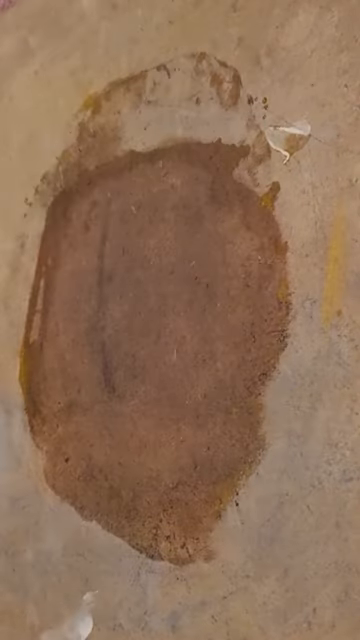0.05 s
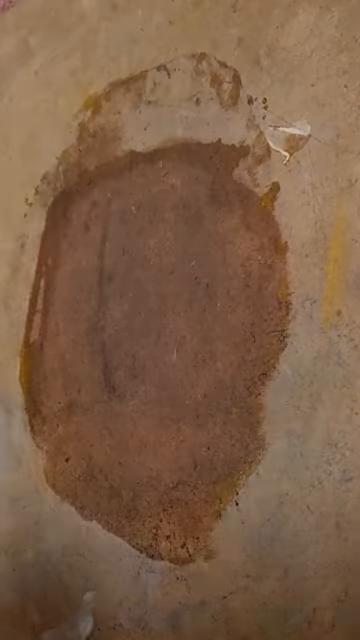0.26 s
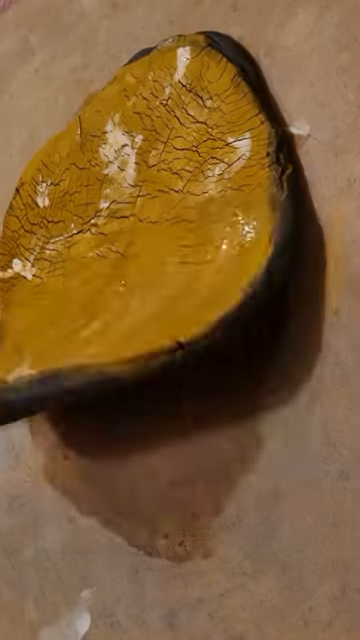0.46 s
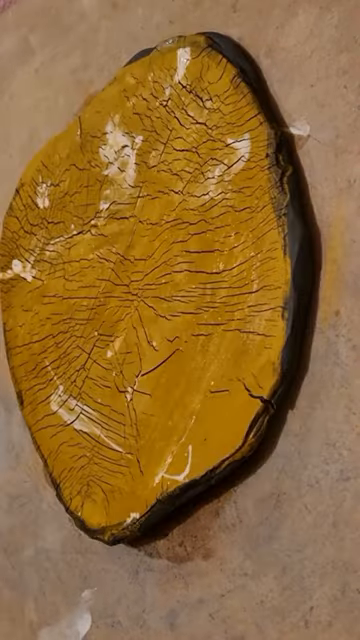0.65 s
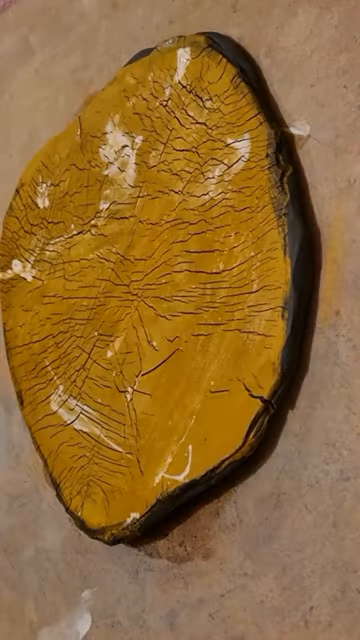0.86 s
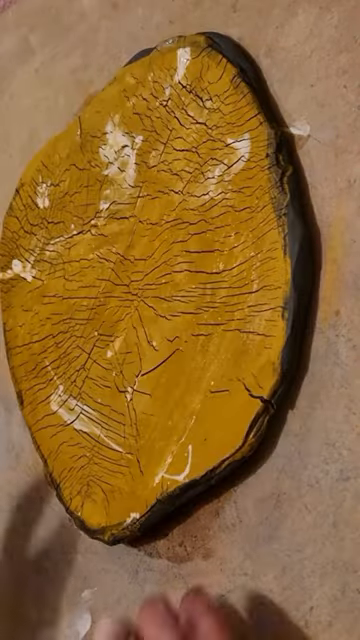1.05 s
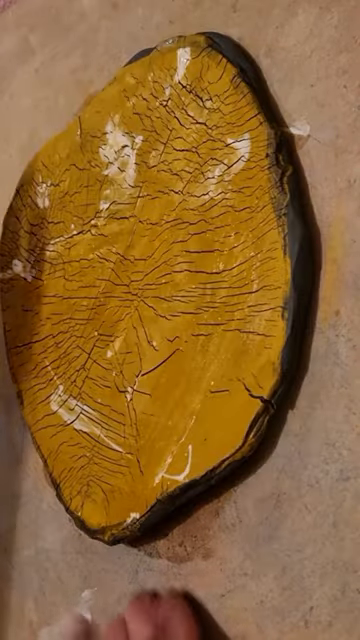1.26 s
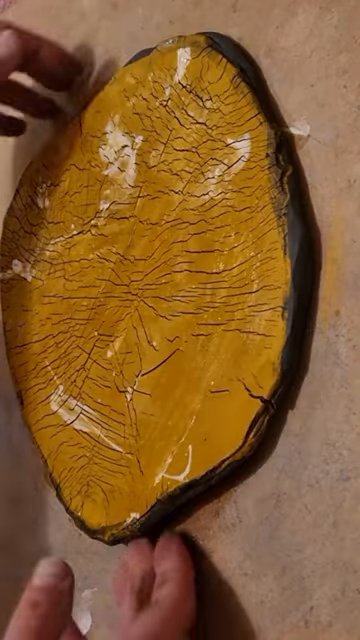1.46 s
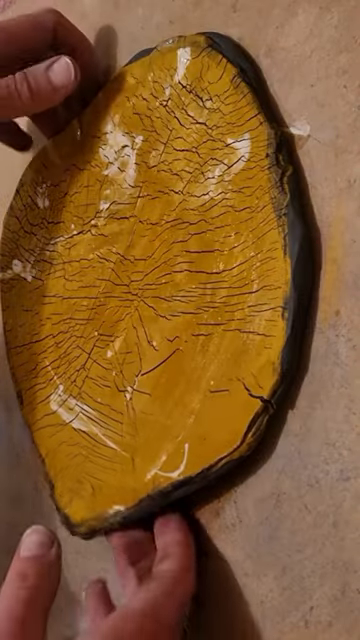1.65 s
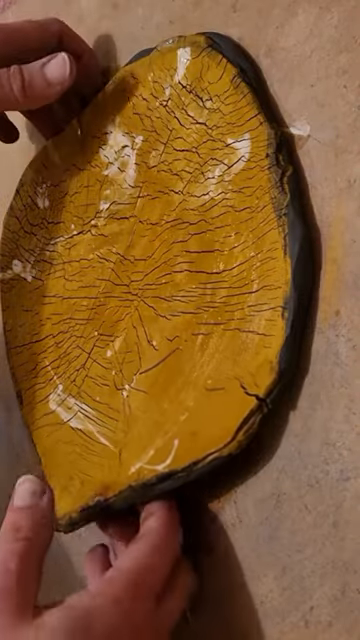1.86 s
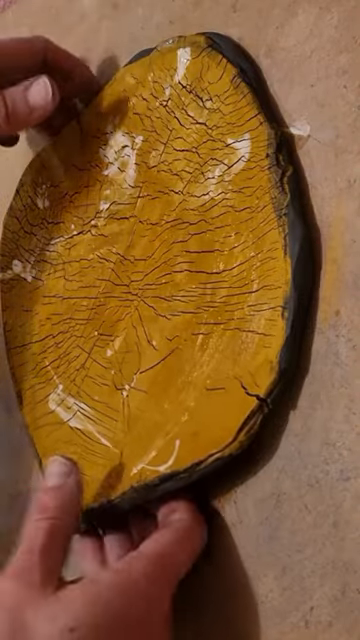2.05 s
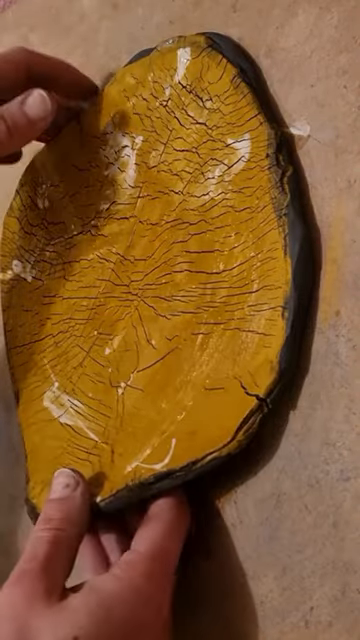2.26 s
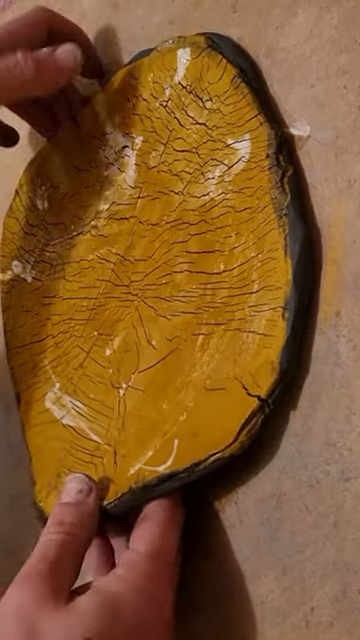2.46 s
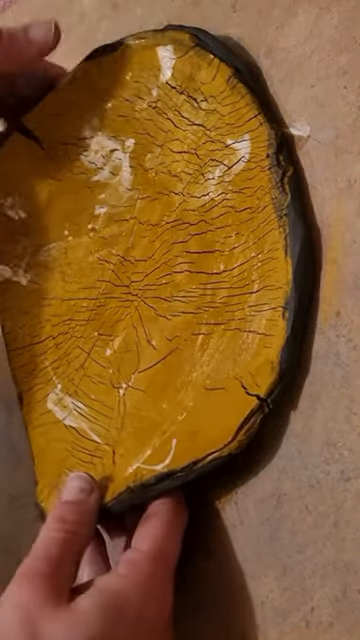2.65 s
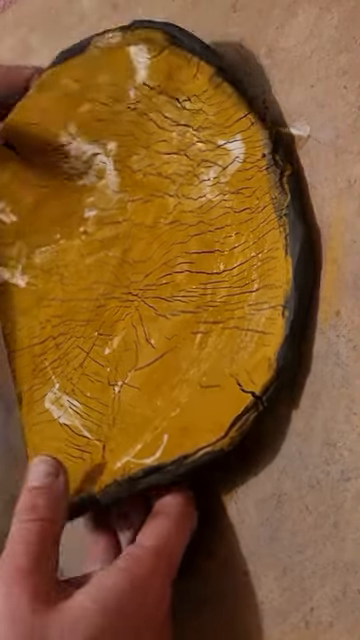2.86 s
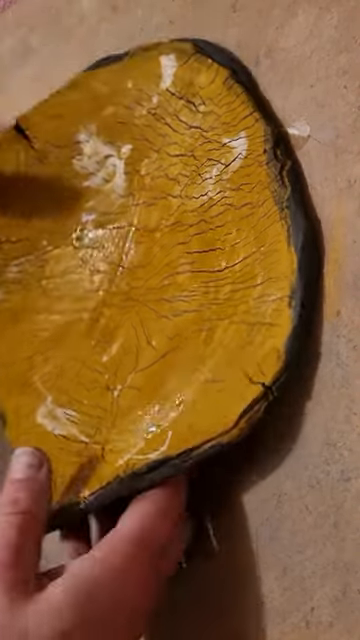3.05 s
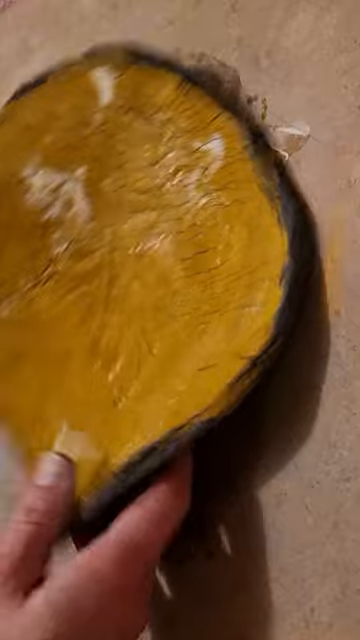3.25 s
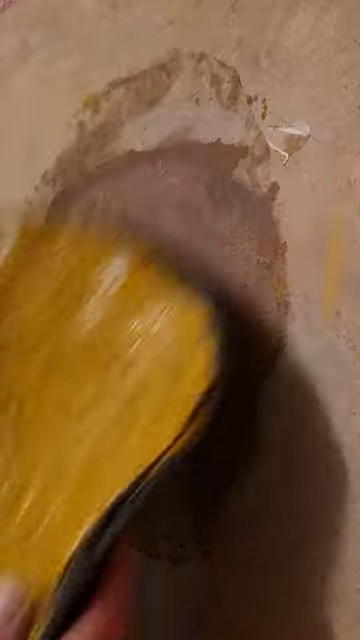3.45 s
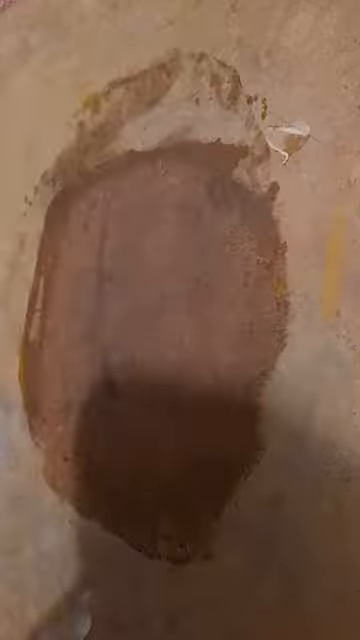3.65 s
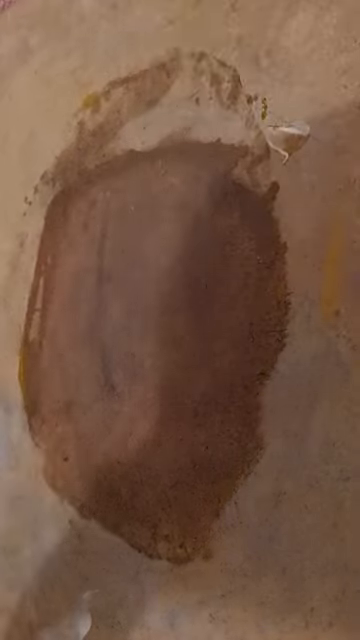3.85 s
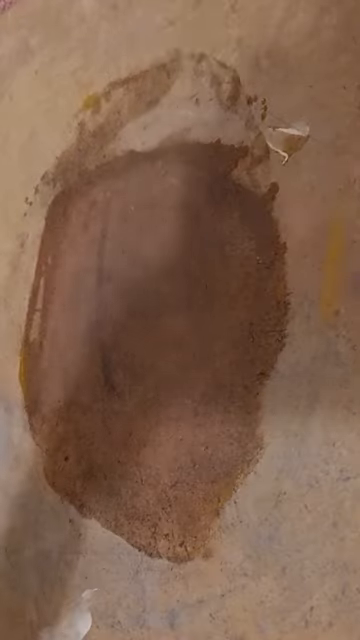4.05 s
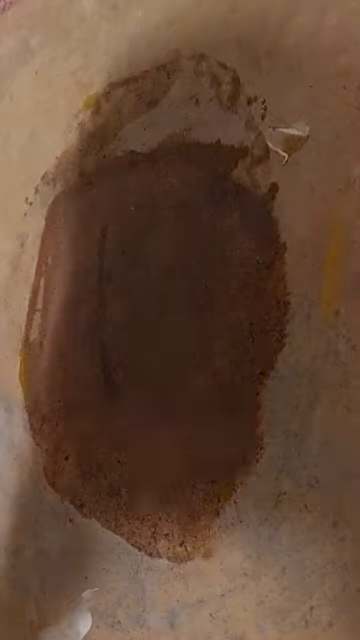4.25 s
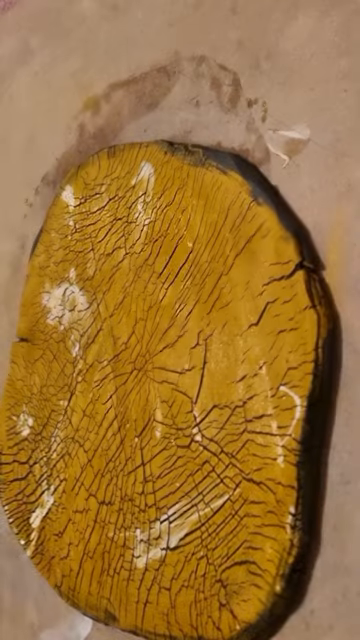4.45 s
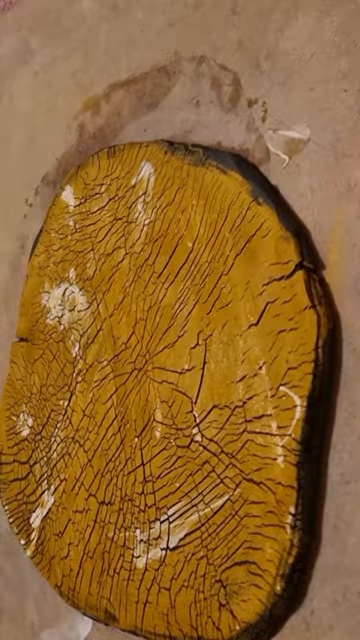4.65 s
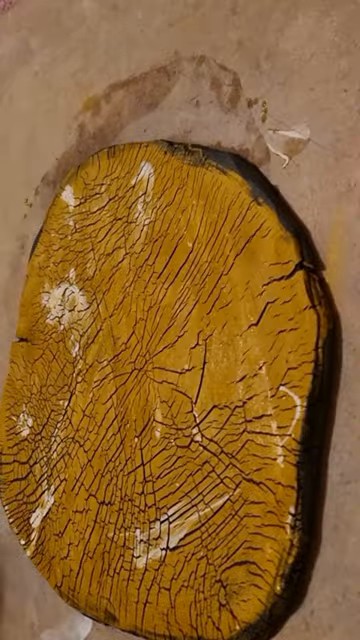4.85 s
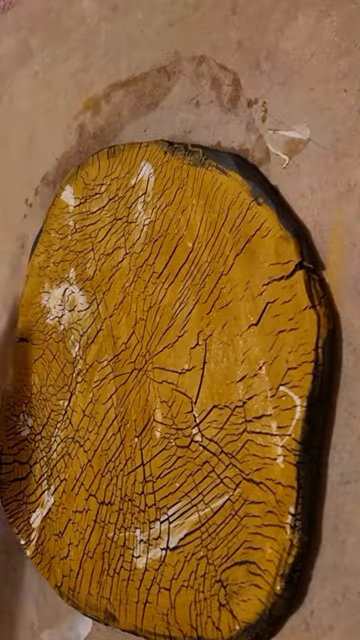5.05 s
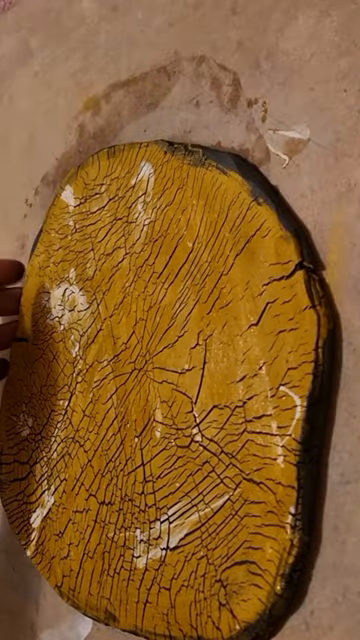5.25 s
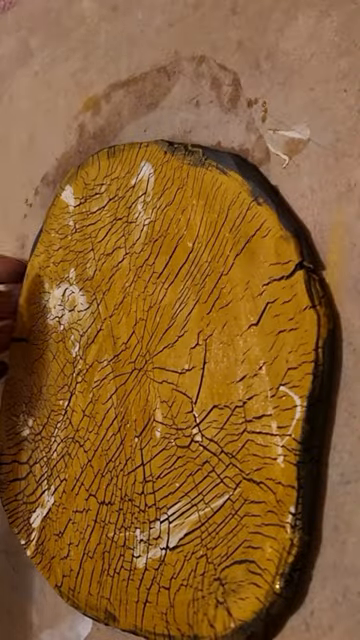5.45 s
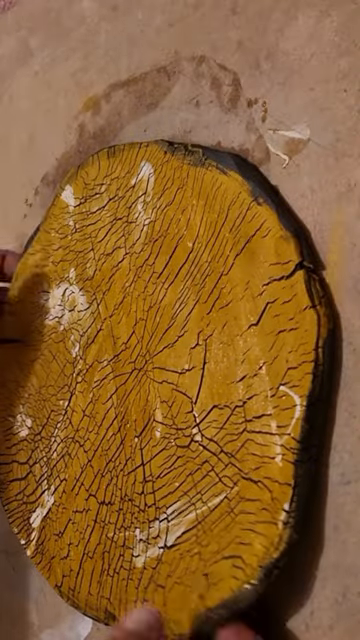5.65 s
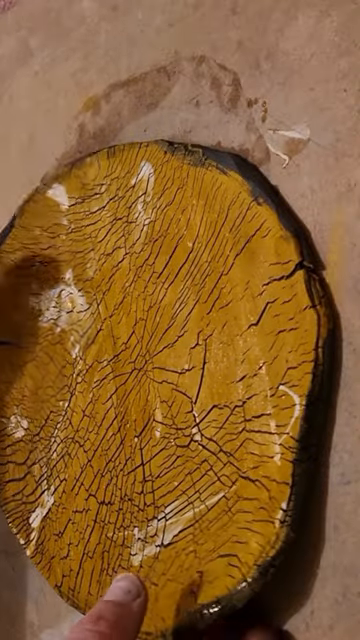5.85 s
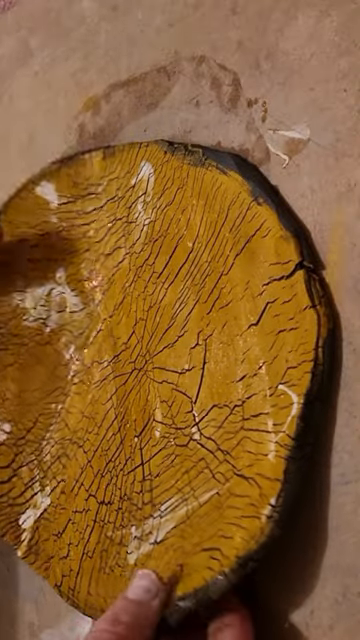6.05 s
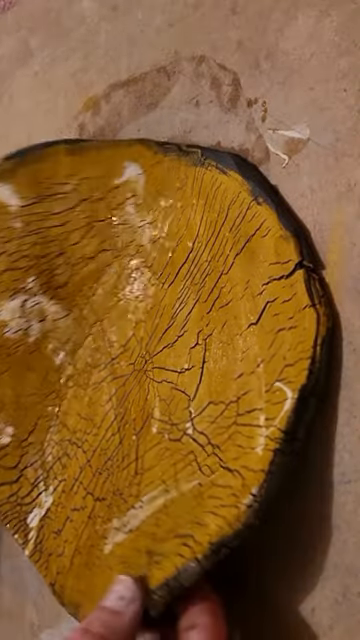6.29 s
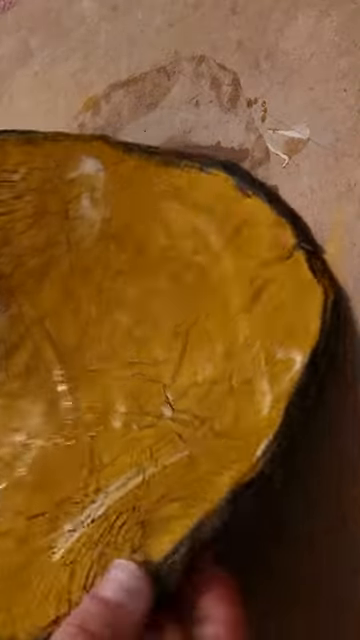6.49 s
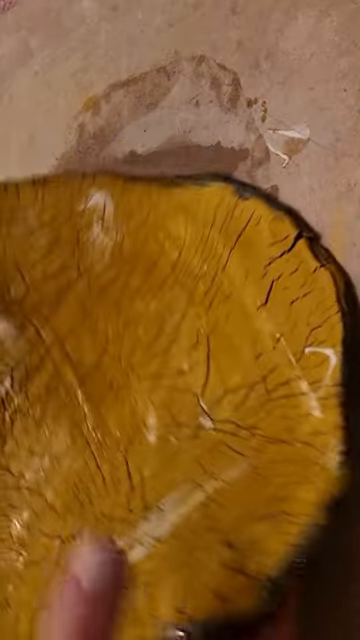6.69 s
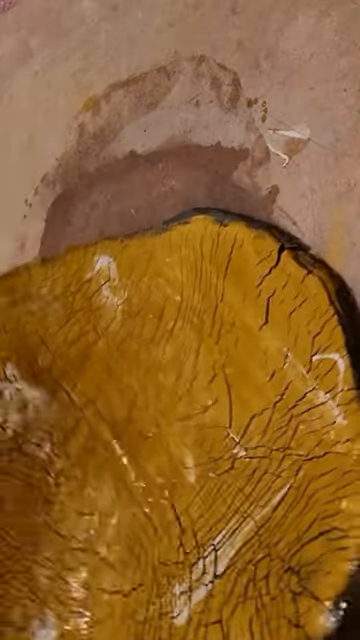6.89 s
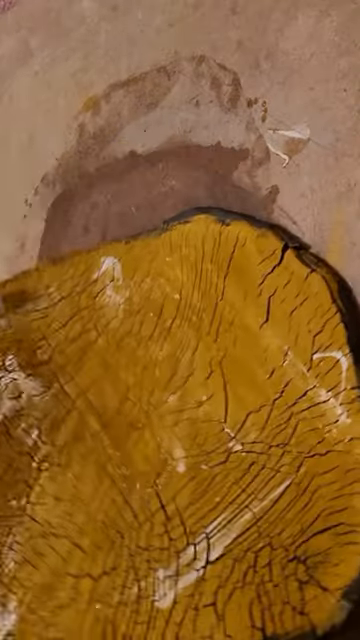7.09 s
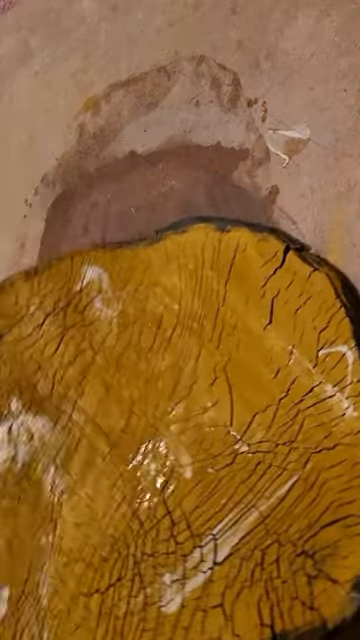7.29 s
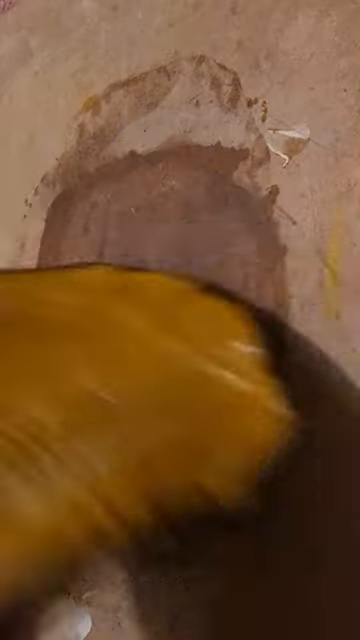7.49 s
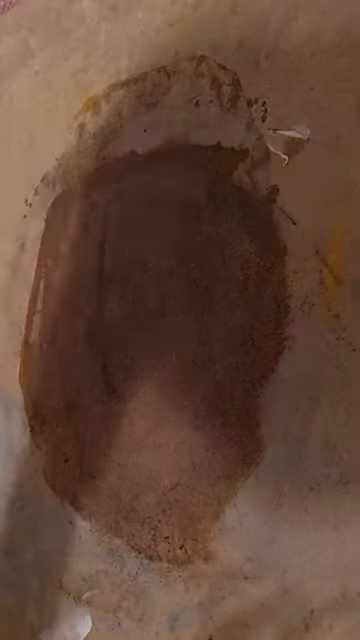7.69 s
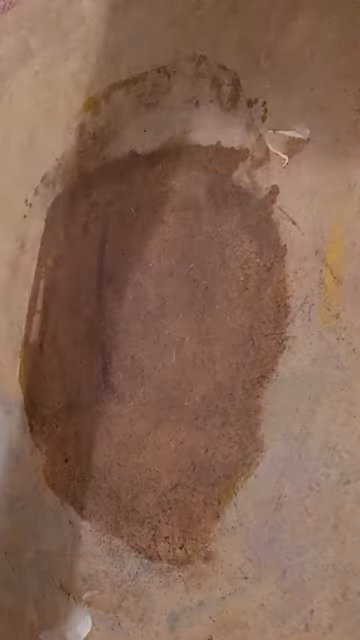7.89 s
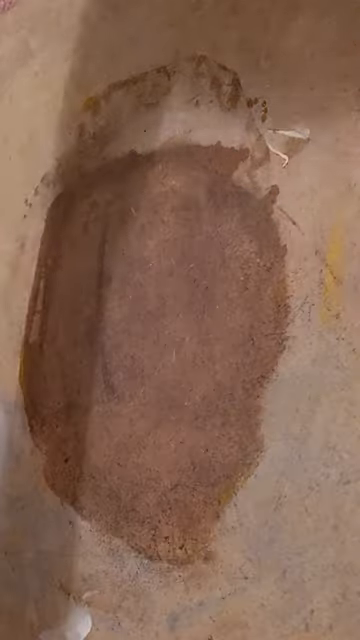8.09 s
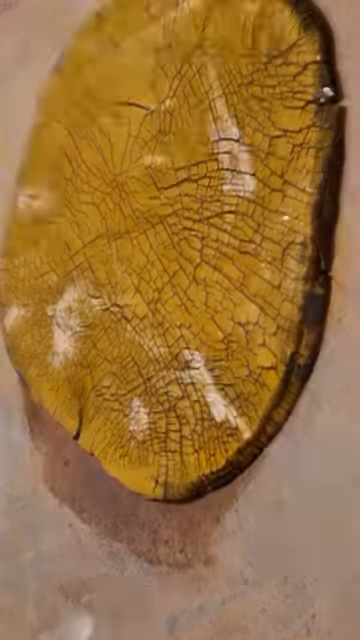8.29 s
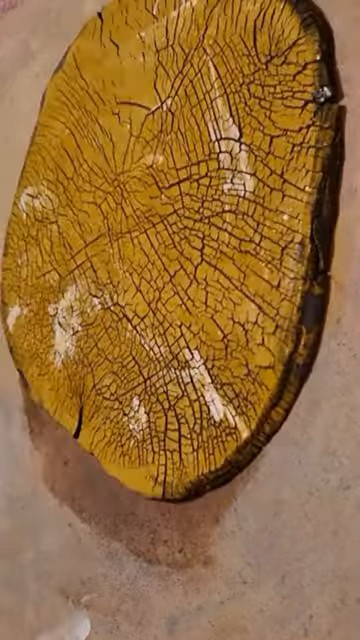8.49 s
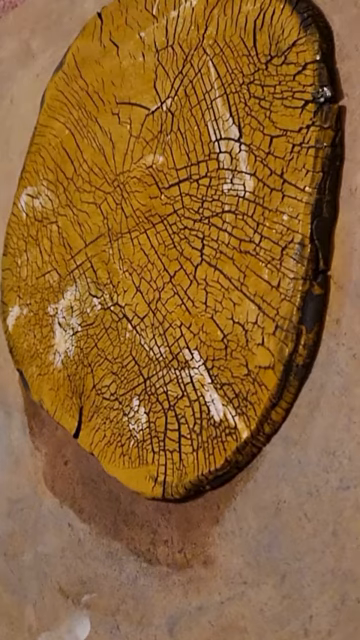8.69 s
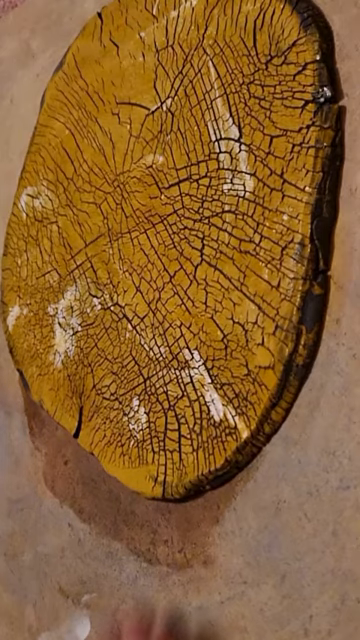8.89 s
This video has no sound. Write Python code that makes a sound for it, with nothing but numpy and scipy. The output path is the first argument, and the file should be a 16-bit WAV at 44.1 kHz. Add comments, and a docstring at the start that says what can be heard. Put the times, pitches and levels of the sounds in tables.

```python
"""Wet clay thrown on a table

A wet slab is thrown three times onto a work table in a small studio, close to the listener. Each throw is two
blows of filtered contact sprays, edge then face: knock, smack and crack, with shaped noise for puffs and spurts.
Decaying sine modes make the table boom; a slow sine sways it after the hardest throws.
Between throws, flickering noise bands rub and peel, gentler blows bump and tiny sines pop.
A fan's faint sine lines and rumbling noise lie beneath."""
import sys
import numpy as np
from scipy import signal
from scipy.fft import rfft, irfft, next_fast_len
from scipy.io import wavfile
from scipy.ndimage import map_coordinates

SR = 44100
rng = np.random.default_rng(int(sys.argv[2]) if len(sys.argv) > 2 else 0)


def persist_wave(psi):
    """Save psi, clipped to +-1, as 16-bit WAV."""
    counts = np.round(np.clip(psi, -1, 1) * 32767).astype(np.int16)
    wavfile.write(sys.argv[1], SR, np.atleast_2d(counts).T)


N = 393813
T = np.arange(SR // 2) / SR  # time within one event, s

# blows of the throws, edge then face: t/s, thud/dB, smack/dB, crack/dB, crack f/Hz, left over right/dB,
# table boom/dB, puff/dB, spurt/dB, puff and spurt brightness/(dB per octave), gap resonance f/Hz
BLOWS = [(0.481, -25.5, -37.5, -40.5, 3379, -2.5, -19.5, -46.5, -29.5, -0.5, 3117),
         (.5325, -8.5, -15, -24.5, 2852, -3, -15, -19, -27.5, -2, 179.8),
         (4.481, -10, -17.5, -25, 3336, -.5, -9.5, -27, -29, 0, 544.8),
         (4.5146, -14.5, -22, -20, 5610, .5, -17, -34.5, -33, -2.5, 1250),
         (8.4291, -16, -20, -23.5, 3231, 0, -38.5, -21.5, -36.5, 2, 4884),
         (8.4448, -29.5, -34.5, -18.5, 3869, -4.5, -9.5, -40.5, -24.5, 0, 344.5)]
# the lifted slab and the knuckles bump the table: t/s, level/dB, knock f/Hz, wetness/0-1
BUMPS = [(1.32, -53.5, 368, 0.73), (2.392, -28.5, 200, 0.74), (2.894, -26.5, 454, .75),
         (3.054, -55.5, 345, 1), (3.113, -48, 420, 0.75), (3.174, -37.5, 350, 0.4), (3.274, -29, 360, 0),
         (3.308, -32.5, 229, .45), (3.428, -51, 174, 0.43), (5.207, -51, 298, 0.7), (5.403, -52, 330, .95),
         (6.025, -55, 376, 1), (6.105, -39.5, 367, 0.97), (6.24, -49, 560, 0.83), (6.287, -44, 234, 0.06),
         (6.348, -47.5, 231, .8), (6.41, -46, 444, .65), (6.614, -49.5, 500, 0.3),
         (6.711, -52.5, 241, 0.46), (7.093, -38.5, 200, 0.13), (7.31, -34.5, 264, .7),
         (7.321, -27, 260, 0.73)]


def amp(db):
    """Decibels to gain."""
    return 10 ** (np.asarray(db) / 20)


def unit(x):
    """Scale to rms 1."""
    return x / np.sqrt(np.mean(x ** 2) + 1e-20)


def punch(x):
    """Scale a short stereo sound to the energy of 5 ms at rms 1."""
    return x / np.sqrt(np.sum(x ** 2) / (2 * .005 * SR))


def along(points, hz):
    """Interpolate (Hz, value) points on a log frequency axis."""
    f, v = np.transpose(points)
    return np.interp(np.log(hz + 1), np.log(f + 1), v)


def bell(hz, centre, octaves):
    """A hump of height 1 on the log frequency axis."""
    return np.exp(-(np.log2((hz + 1) / centre) / octaves) ** 2)


def add(track, s, x):
    """Mix x into the track from time s."""
    i = round(s * SR)
    track[..., i:i + x.shape[-1]] += x[..., :N - i]


def filtered(x, response):
    """Multiply the spectrum of x by a complex response, padded against wrap-around."""
    m = 2 * next_fast_len(x.shape[-1] // 2 + 4096)
    spectrum = rfft(x, m) * response(np.fft.rfftfreq(m, 1 / SR))
    return irfft(spectrum, m)[..., :x.shape[-1]]


def causal(db):
    """The minimum-phase response with this gain: it rings only after its input."""
    c = irfft(db * np.log(10) / 20)  # cepstrum, folded onto positive time
    c[1:len(c) // 2] *= 2
    c[len(c) // 2 + 1:] = 0
    return np.exp(rfft(c))


def noise(spectrum, n, tilt=0):
    """Coloured stereo noise of rms 1, alike in the bass and unrelated in the treble."""
    # stereo width: f/Hz, left-right likeness/0-1
    likeness = [(100, 0.95), (300, 0.93), (600, 0.52), (1200, 0.011), (3000, 0.019), (15000, 0.02)]

    def mid_and_side(hz):
        turn = np.arccos(np.clip(along(likeness, hz), -1, 1)) / 2
        colour = amp(along(spectrum, hz) + tilt * np.log2(np.maximum(hz, 200)))  # tilt in dB per octave
        return colour * [np.cos(turn), np.sin(turn)]

    mid, side = filtered(rng.standard_normal((2, n)), mid_and_side)
    return unit(np.array([mid + side, mid - side]))


def wobble(rate, n):
    """A smooth random curve, rate knots a second."""
    knots = rng.standard_normal(int(n * rate / SR) + 4)
    return map_coordinates(knots, [np.arange(n) * rate / SR])


def shifting(x, depth_db):
    """The hollows under the clay change their resonances as it moves: a drifting random gain field."""
    hz, t, z = signal.stft(x, SR, nperseg=1024)
    places = np.meshgrid(np.sqrt(hz) / 2, 20 * t, indexing="ij")
    field = map_coordinates(rng.standard_normal((80, 40)), places)
    moved = signal.istft(z * amp(depth_db * field), SR, nperseg=1024)[1]
    return unit(moved[:, :x.shape[-1]])


def swell(rise, fall):
    """An envelope that climbs 40 dB in rise s to its peak at mid-event and drops 40 dB in fall s."""
    t = T - T.mean()
    return amp(-40 * np.maximum(-t / rise, t / fall))


def background():
    """Room rumble as shaped noise, with the fan's faint sine lines wandering in phase."""
    # room tone: f/Hz, relative density/dB
    air = [(21, -32.5), (35, -4.5), (62, 2), (126, -11), (265, -20.5), (301, -9.5), (370, -23), (399, -11),
           (466, -36), (543, -29.5), (758, -31.5), (840, -33), (6360, -44.5), (14800, -46), (16000, -52)]
    # fan lines: f/Hz, relative level/dB
    fan = [(301.5, -85.5), (398.4, -80), (4700, -109), (6896, -108), (8296, -104)]
    t = np.arange(N) / SR
    hum = 0
    for hz, db in fan:
        hum += amp(db) * np.sqrt(2) * np.sin(2 * np.pi * hz * t + 0.23 * wobble(1.5, N))
    return amp(-63.5) * noise(air, N) + amp(-5.5) * hum


def studio(x, gap, echo_db):
    """The walls answer after a short gap (s) with decaying noise; the bass lingers longest."""
    # reverberation: f/Hz, t60/s
    decay = [(80, 0.53), (220, .4), (500, 0.26), (2000, .33), (6000, 0.28), (10000, 0.24), (15000, 0.029)]
    # echo colour: f/Hz, relative level/dB
    walls = [(40, -14.5), (125, -17), (190, 0), (400, -3.5), (700, -1), (1100, -5), (2500, -1),
             (6000, -1.5), (10000, -2), (15000, -0.5)]
    out = np.zeros((2, N))
    for i in range(0, N, SR):  # a new echo pattern every second, as the potter moves
        hz, t, z = signal.stft(noise(walls, len(T)), SR, nperseg=256)
        fading = z * amp(-60 * t / along(decay, hz)[:, None])
        tail = signal.istft(fading, SR, nperseg=256)[1][:, :len(T)]
        tail = tail * (1 - np.exp(-(T / gap) ** 2))
        tail = tail / np.linalg.norm(tail[0])
        add(out, i / SR, signal.fftconvolve(x[:, i:i + SR], tail, axes=1))
    return amp(echo_db) * out


def nearby(x, strength, reach):
    """Table, hands and apron throw back quick copies within reach s, which colour each ear differently."""
    out = np.zeros((2, N))
    step = SR // 2  # new copies every half second
    for i in range(0, N, step):
        taps = np.zeros((2, SR // 20))
        for ear in taps:
            delays = (SR * reach * rng.uniform(.1, 1, size=4)).astype(int)
            ear[delays] = rng.choice([-1, 1], size=4) / 2
        add(out, i / SR, signal.fftconvolve(x[:, i:i + step], taps, axes=1))
    small = lambda f: 1j * f / (1j * f + 600)  # small surfaces return little bass
    return x + strength * filtered(out, small)


def sway(hz, t60):
    """The hardest throws rock the frame on its legs: a slow sine that outlasts the ring of the top."""
    # sways: t/s, relative level/dB
    rocks = [(4.484, -29), (8.443, -28.5)]
    out = np.zeros(N)
    t = np.arange(2 * SR) / SR
    for s, db in rocks:
        rocking = np.sin(2 * np.pi * hz * t + 0.35 * wobble(7.2, len(t)))
        add(out, s, amp(db - 60 * t / t60) * rocking * (1 - np.exp(-t / 0.011)))
    return out


def table():
    """Every blow, sag and bump rings the table's modes; a longer push favours the lowest ones."""
    # modes before the load retunes them: f/Hz, relative level/dB, t60/s
    modes = [(46, -2, 0.28), (66.8, -0.5, 0.4), (75, -8, 0.41), (161.5, -10, 0.33), (185.6, -12, 0.36),
             (231, -15, 0.25), (292, -24, 0.23), (340, -13.5, 0.47), (520.6, -17, 0.13), (610, -20, 0.16),
             (854, -21, .2)]
    # each throw loads the table in a new place: from t/s, tuning factor of the modes
    loads = [(0, 1.01), (4, .97), (8, 1.09)]
    # the weight sags and settles: t/s, relative push level/dB
    sags = [(.605, -19.5), (.725, -38), (2.396, -47), (3.309, -33.5), (4.64, -30.5), (8.54, -21)]
    slap_push, sag_push, bump_push = .007, 0.0074, 0.0012  # duration of contact, s
    bump_boom_db, bump_lowest_hz = -16.5, 150  # a bump near the rim rings mostly above this pitch
    out = np.zeros((2, N))
    t = np.arange(3 * SR // 4) / SR
    ears = .22 * np.array([[-1], [1]])  # phase offset at each ear, radians
    pushes = [(s, boom_db, slap_push, 0) for s, _, _, _, _, _, boom_db, *_ in BLOWS]
    pushes += [(s, db, sag_push, 0) for s, db in sags]
    pushes += [(s, db + bump_boom_db, bump_push, bump_lowest_hz) for s, db, *_ in BUMPS]
    for s, db, push, lowest_hz in pushes:
        tuning = [factor for since, factor in loads if since <= s][-1]
        settling = 1.1 * wobble(15, len(t))  # the spreading clay keeps retuning the top
        settling = settling - settling[0]
        ring = 0
        for hz, level, t60 in modes:
            reach = 1 / np.hypot(1, hz * push) / np.hypot(1, (lowest_hz / hz) ** 2)
            phase = 2 * np.pi * hz * tuning * t + rng.normal() * settling
            ring = ring + amp(level - 60 * t / t60) * np.exp(1j * phase) * reach
        add(out, s, amp(db - 1) * np.imag(ring * np.exp(1j * ears)) * (1 - np.exp(-t / push)))
    return out


def pops():
    """Tiny air pockets pop in the settling wet clay: short, high, wavering sines."""
    # bubbles: t/s, f/Hz, level/dB
    bubbles = [(4.692, 11950, -59), (8.608, 11770, -60), (8.81, 11950, -78)]
    out = np.zeros(N)
    for s, hz, db in bubbles:
        ring = np.sin(2 * np.pi * hz * T + 0.95 * wobble(300, len(T)))
        add(out, s, amp(db - 60 * T / 0.083) * ring)
    return out


def strokes():
    """Sticky friction of fingers and clay: a firm grip drags low, a light one leaves a grainy rub and fine hiss."""
    # slides over the top: start t/s, length/s, rub/dB, grip as drag over rub/dB
    slides = [(0.992, .26, -92, -17.5), (1.309, .21, -81.5, 2), (1.555, .08, -73, 6.5),
              (1.648, 0.12, -64.5, -2), (1.77, 0.21, -73.5, -14.5), (2.001, .24, -79.5, -2),
              (2.94, .14, -80.5, 11.5), (3.428, .15, -79, -6), (3.558, .1, -71.5, -12),
              (5.297, .27, -84, 10), (5.56, .25, -80, 8), (5.819, .11, -75, 4.5), (6.016, .08, -70.5, 3.5),
              (6.109, .19, -74.5, 4), (6.349, .28, -80, -25), (6.47, .18, -87.5, 18),
              (7.461, 0.17, -78.5, 2)]
    # low drag: f/Hz, relative density/dB
    drag = [(120, -18), (350, 7), (600, 5), (850, 1), (1100, -3.5), (1500, -3.5), (2300, -14),
            (3200, -14.5), (6000, -38)]
    # grainy rub: f/Hz, relative density/dB
    rub = [(900, -35), (2500, 0), (5500, 0), (8500, 0), (12000, -21.5)]
    # fine hiss: f/Hz, relative density/dB
    hiss = [(5000, -15.5), (10000, -4), (15500, -2.5)]
    attack, release = 0.023, 0.083  # s
    out = np.zeros((2, N))
    for s, length, rub_db, grip_db in slides:
        t = np.arange(0, length + release / 2, 1 / SR)
        motion = np.clip(np.minimum(t / attack, (t[-1] - t) / release), 0, 1)
        stick = amp(1.6 * wobble(39, len(t)) + 3.0 * wobble(550, len(t)))
        # hiss is -80 dB at a medium rub of -78 dB; it grows slowly with the rub and is smothered by grip
        hiss_db = -80 + .45 * (rub_db + 78) - 0.23 * grip_db
        for db, spectrum in ((rub_db + grip_db, drag), (rub_db, rub), (hiss_db, hiss)):
            friction = shifting(stick * noise(spectrum, len(t)), depth_db=3.5)
            add(out, s, amp(db) * motion * friction)
    return out


def squelch(tilt, gap_hz, gap_db, octaves):
    """Gritty air and slip rush through a gap that resonates: ragged noise with one spectral hump."""
    # rushing air and slip: f/Hz, relative density/dB
    rush = [(60, -16.5), (200, 1.5), (400, 3), (900, -4), (1600, -10.5), (3300, -12.5), (6000, -15),
            (10000, -22), (15500, -27)]
    grit = amp(2.8 * wobble(800, len(T)))
    gap = lambda f: amp(gap_db * bell(f, gap_hz, octaves))
    return shifting(filtered(grit * noise(rush, len(T), tilt), gap), depth_db=3)


def hollow(x):
    """The pocket of air under the slab colours what happens in it: a twofold band resonance."""
    centre, width = 1280, 630  # Hz
    return filtered(x, lambda f: (1j * f * width / (centre ** 2 - f * f + 1j * f * width)) ** 2)


def peels():
    """Air is sucked under the slab as it peels off the sticky top, and threads of slip crackle as they snap."""
    # peels: peak t/s, level/dB, length/s, brightness/(dB per octave), gap resonance f/Hz
    lifts = [(1.72, -56.5, .24, -1.5, 844), (2.386, -39.5, 0.088, 2.1, 3130), (2.67, -55.5, 0.25, 0, 805),
             (2.97, -58.5, .24, -2.5, 750), (3.17, -51.5, 0.34, -2.3, 880), (3.341, -49, 0.13, -1.2, 704),
             (5.226, -54.5, .12, .3, 1000), (5.404, -47, .045, 0, 1290), (5.763, -67.5, .12, -0.5, 2350),
             (5.865, -65.5, 0.21, 1, 3470), (5.958, -65.5, 0.28, -0.5, 1450), (6.245, -59, 0.22, -1, 1410),
             (6.379, -60, 0.22, -4.5, 1468), (7.125, -61.5, .12, 0, 660)]
    rise_share = .45  # share of a peel spent swelling
    threads_per_s, thread_db = 260, -9  # level relative to the rush of air
    out = np.zeros((2, N))
    for s, db, length, tilt, gap_hz in lifts:
        snaps = rng.standard_normal((2, len(T))) * (rng.random(len(T)) < threads_per_s / SR)
        suck = squelch(tilt, gap_hz, gap_db=10, octaves=.15) + amp(thread_db) * unit(hollow(snaps))
        envelope = swell(rise_share * length, (1 - rise_share) * length)
        add(out, s - T.mean(), amp(db) * envelope * suck)
    return out


def contact(spread, t60):
    """One push plus a decaying spray of small contacts that differs at each ear."""
    spray = rng.standard_normal((2, len(T))) * amp(-60 * T / t60)
    return (T == 0) + spread * spray / np.linalg.norm(spray[0])


def blow(thud_db, smack_db, crack_db, crack_hz, touch):
    """Clay hits the top: a dull knock coloured by the touch, the wet face's smack and escaping air's crack."""
    # knock resonances: f/Hz, width/Hz, relative level/dB
    knock = [(211.54, 100, 1), (367, 120, 2), (560, 170, -5.5), (790, 240, -3)]
    # wet smack: f/Hz, relative density/dB
    wet_face = [(400, -29), (800, -4.5), (1200, 3), (1600, -7.5), (2100, -7.5), (3000, -11), (6000, -32.5)]
    # air crack: f/Hz, relative density/dB
    escaping_air = [(700, -28), (2000, -9.5), (3500, -2.5), (5500, -2), (7500, -6), (11000, -12.5),
                    (13000, -7), (15500, -6)]
    body = lambda f: sum(amp(db) * 1j * f * w / (c * c - f * f + 1j * f * w) for c, w, db in knock)
    pocket = lambda f: 7 * bell(f, crack_hz, octaves=0.73)  # the air pocket's resonance, dB
    thud = filtered(contact(spread=0.23, t60=0.016), lambda f: body(f) * causal(along(touch, f)))
    smack = filtered(contact(spread=0.98, t60=.012), lambda f: causal(along(wet_face, f)))
    crack = filtered(contact(spread=2.4, t60=0.0045), lambda f: causal(along(escaping_air, f) + pocket(f)))
    return -amp(thud_db) * punch(thud) - amp(smack_db) * punch(smack) + amp(crack_db) * punch(crack)


def bumps():
    """Gentle blows while the slab is picked up, brighter when wet; the soft clay gives before it knocks."""
    out = np.zeros((2, N))
    give = .003  # s
    for s, db, hz, wetness in BUMPS:
        wet = lambda dry_end, wet_end: np.interp(wetness, (0, 1), (dry_end, wet_end))
        smack_db, crack_db = wet(-42.5, -13), wet(-42.5, -21.5)
        hollow_db, edge_hz = wet(-38, -10.5), wet(550, 920)
        fingertip = [(hz / 6, -20), (hz / 2, -2), (hz, 0), (max(edge_hz, hz), -5),
                     (edge_hz * 1.27, -25), (edge_hz * 5, -55)]  # (Hz, dB)
        ring = amp(db + hollow_db) * punch(hollow(contact(spread=.6, t60=.025)))
        knock = blow(db - 5.5, db + smack_db, db + crack_db, 5300, fingertip)
        add(out, s + give, knock + ring)
    soft_hz = 9000  # slow contacts lack the top of a slap
    return filtered(out, lambda f: 1 / (1 + (f / soft_hz) ** 4))


def squirts():
    """Every blow drives air and slip from the closing gap: a puff just before, a spurt just after."""
    # puff of air: delay of the peak/s, rise/s, fall/s
    puff = (-.003, .028, .03)
    # spurt of slip: delay of the peak/s, rise/s, fall/s
    spurt = (.016, 0.042, .15)
    out = np.zeros((2, N))
    for s, *_, puff_db, spurt_db, tilt, gap_hz in BLOWS:
        for db, (delay, rise, fall) in ((puff_db, puff), (spurt_db, spurt)):
            rush = squelch(tilt, gap_hz, gap_db=9, octaves=0.074)
            add(out, s + delay - T.mean(), amp(db) * swell(rise, fall) * rush)
    return out


def slaps():
    """Each throw lands in two blows, edge first, then the face."""
    out = np.zeros((2, N))
    flat_face = [(30, -11.5), (110, -4.5), (180, 1.5), (400, 1.5), (900, -2.5),
                 (1500, -7.5), (4000, -26.5), (12000, -49.5)]  # (Hz, dB)
    for s, thud_db, smack_db, crack_db, crack_hz, pan_db, *_ in BLOWS:
        pan = amp([[pan_db / 2], [-pan_db / 2]])
        add(out, s, blow(thud_db, smack_db, crack_db, crack_hz, flat_face) * pan)
    return out


def scene():
    """All the clay sounds in the room, over the table's boom and the background."""
    throws = slaps() + squirts()
    handling = bumps() + peels() + strokes() + pops()
    direct = amp(-0.5) * nearby(throws + handling, strength=0.77, reach=.003)
    room = studio(throws, gap=0.0063, echo_db=-7.5) + studio(handling, gap=0.0044, echo_db=-11.0)
    boom = (table() + sway(hz=32.18, t60=1.3)) * amp([[-.5], [.5]])  # slightly to the right
    return direct + room + boom + background()


def record(dry):
    """The recorder rounds off peaks near full scale, thins the deepest bass and cuts steeply at its band limit."""
    held = dry / (1 + np.abs(dry / 1.1) ** 6) ** (1 / 6)
    top_hz, bass_hz = 15850, 18
    band = lambda hz: 1 / (1 + (hz / top_hz) ** 120)
    return filtered(held, lambda hz: band(hz) * (1j * hz / (1j * hz + bass_hz)))


dry = scene()
out = record(dry)
persist_wave(out)
```